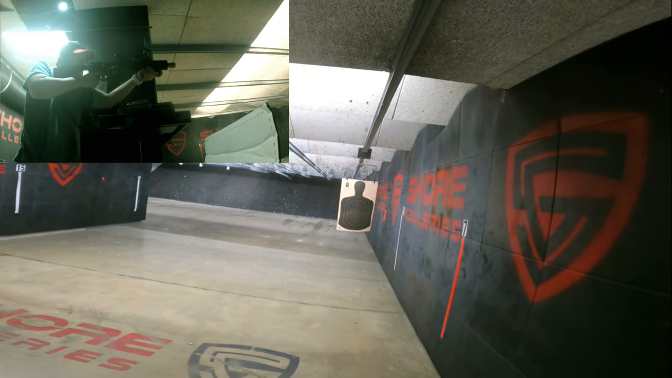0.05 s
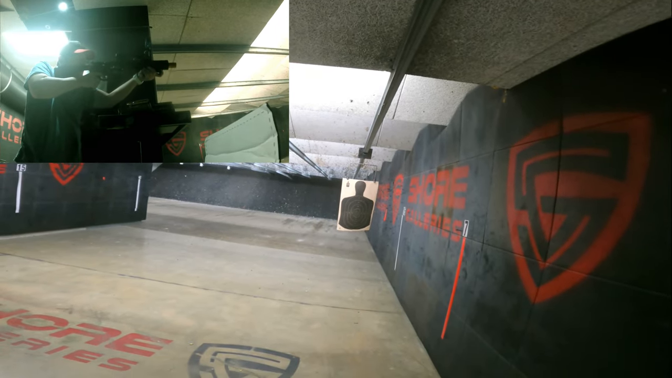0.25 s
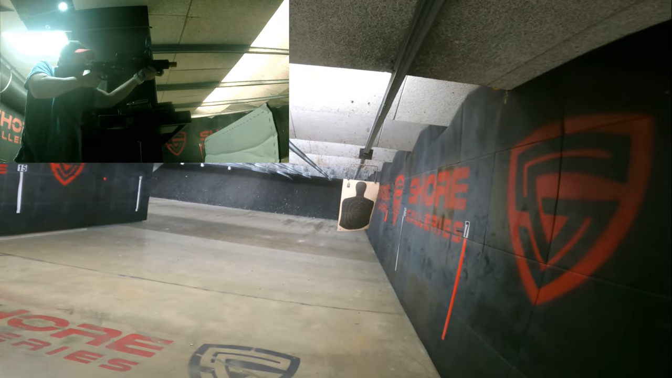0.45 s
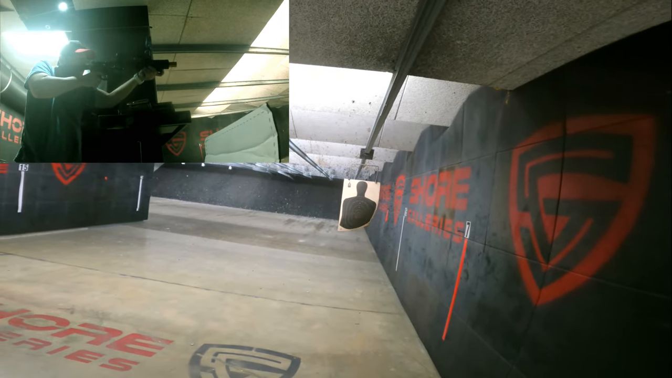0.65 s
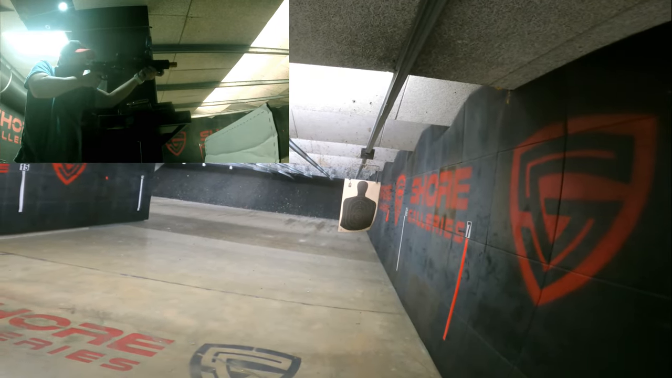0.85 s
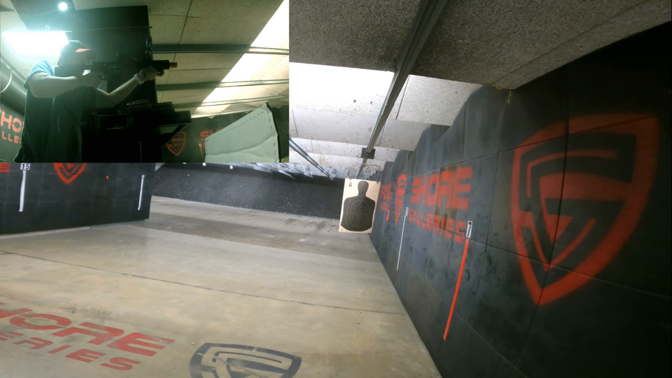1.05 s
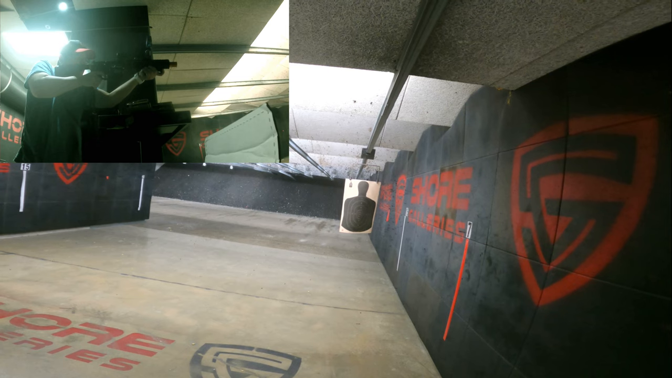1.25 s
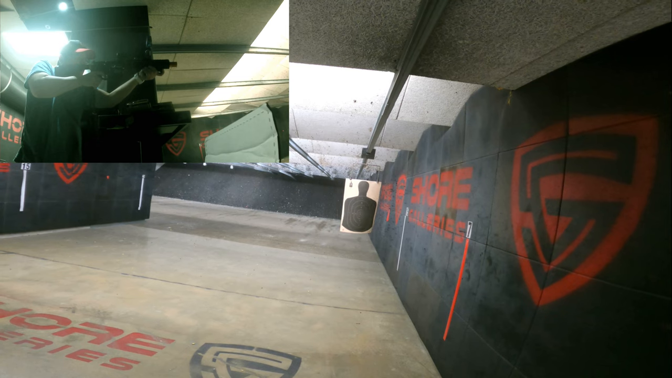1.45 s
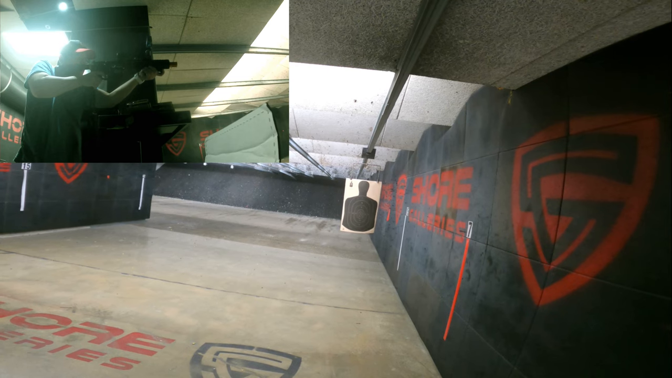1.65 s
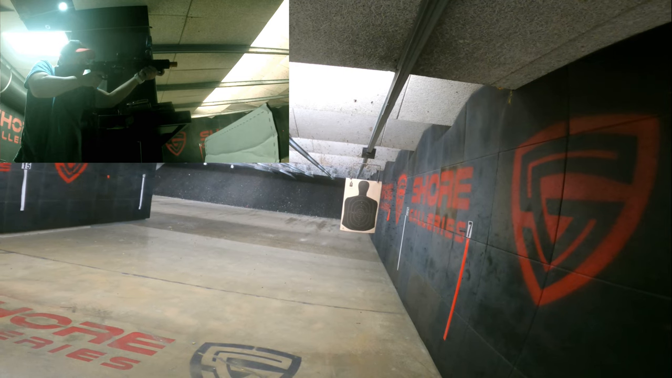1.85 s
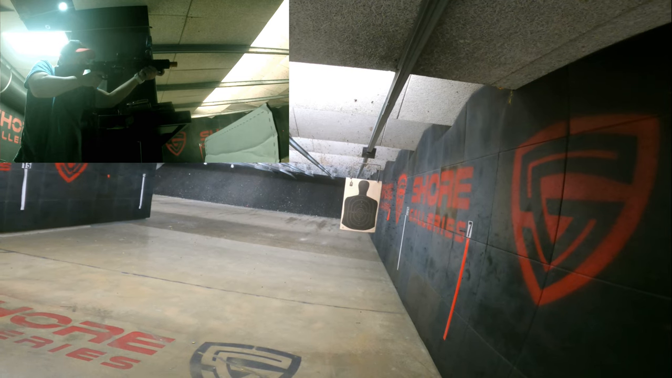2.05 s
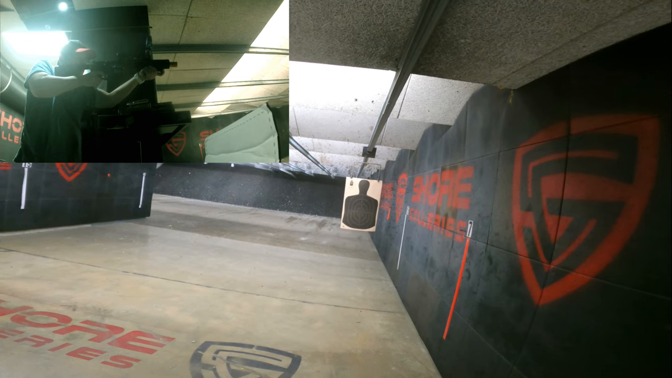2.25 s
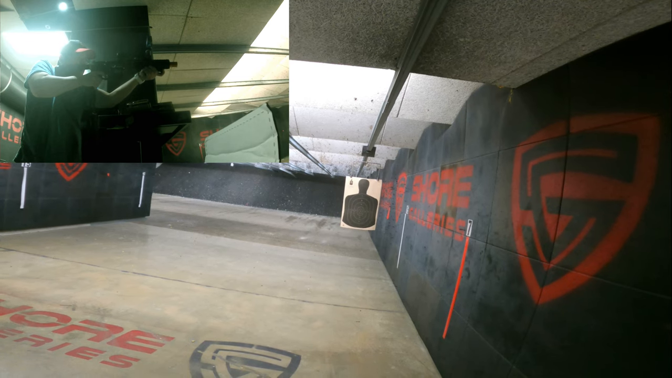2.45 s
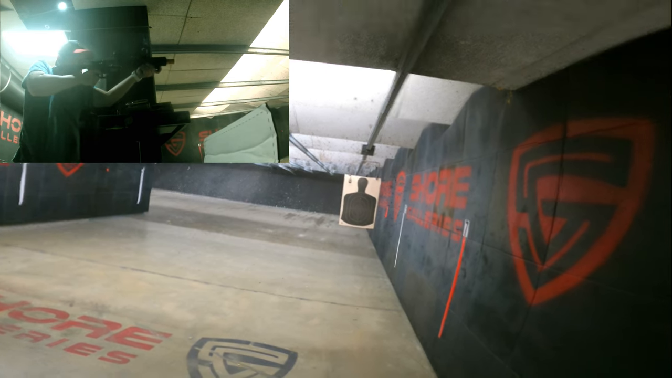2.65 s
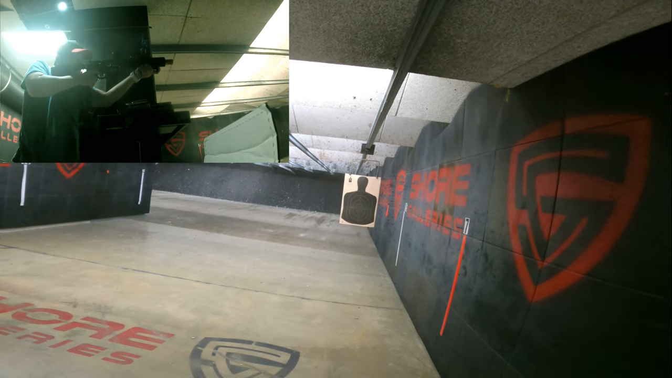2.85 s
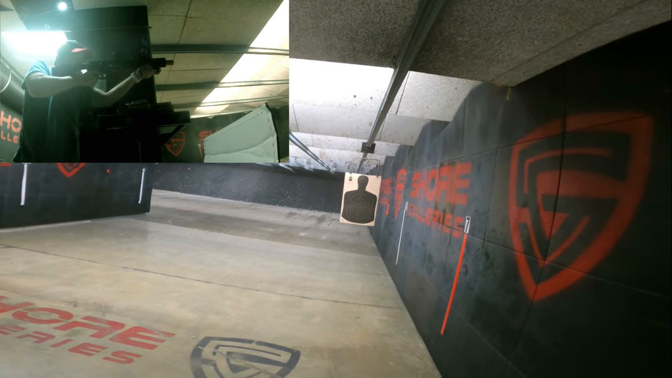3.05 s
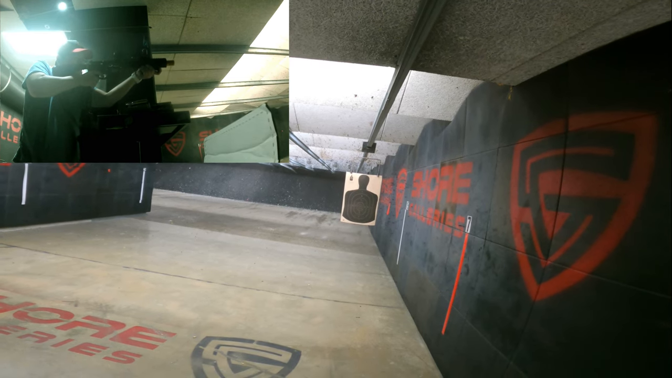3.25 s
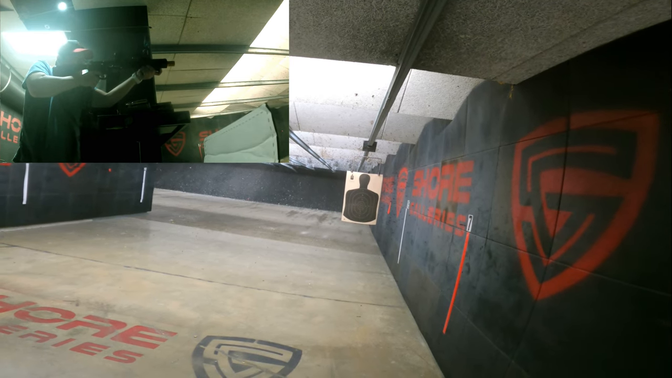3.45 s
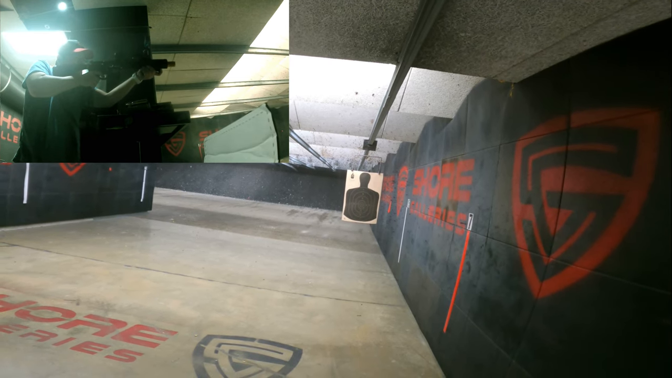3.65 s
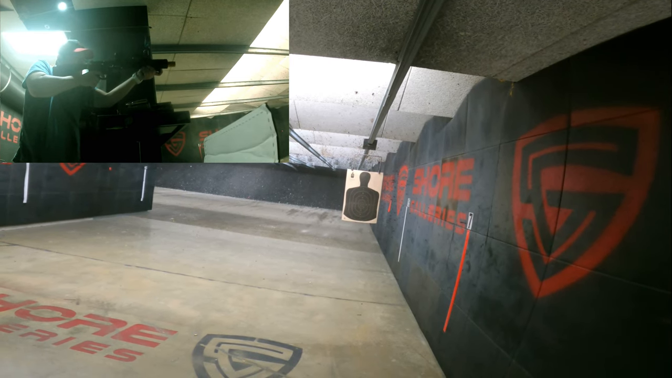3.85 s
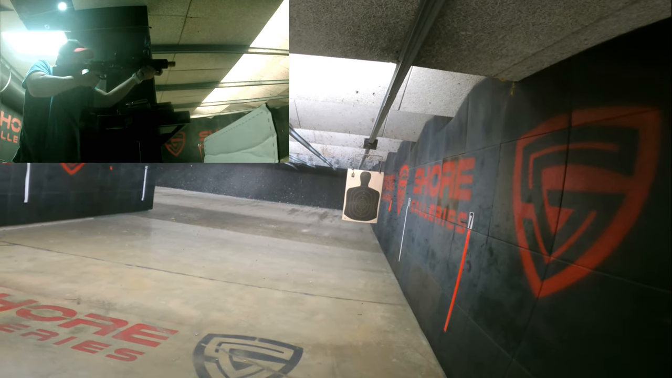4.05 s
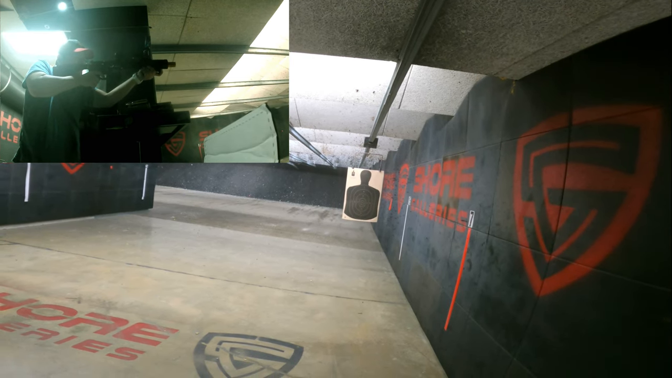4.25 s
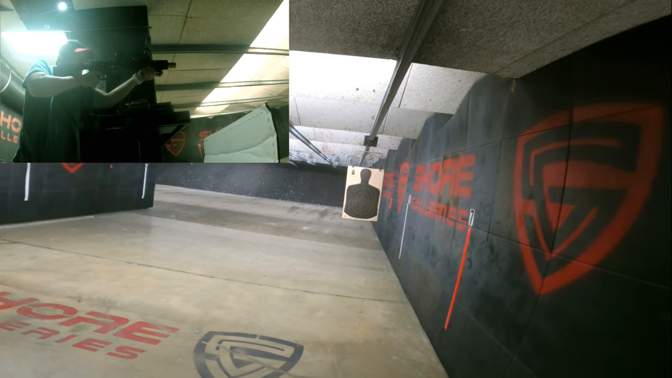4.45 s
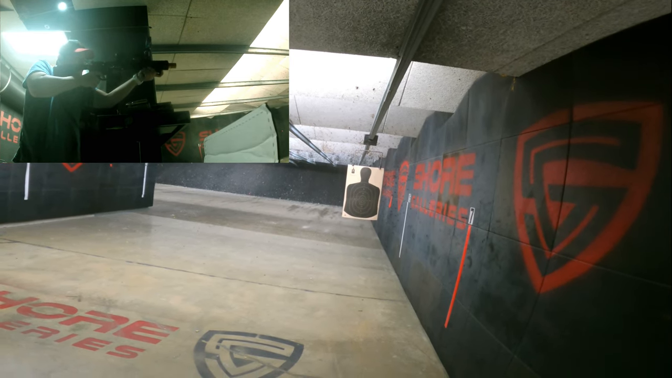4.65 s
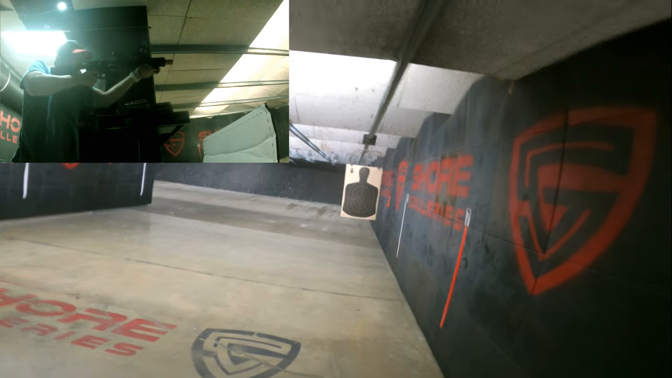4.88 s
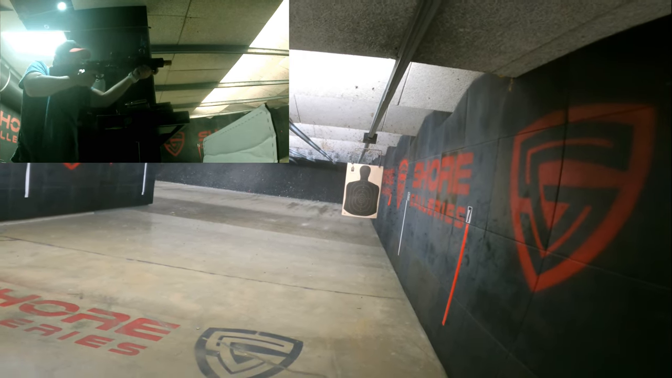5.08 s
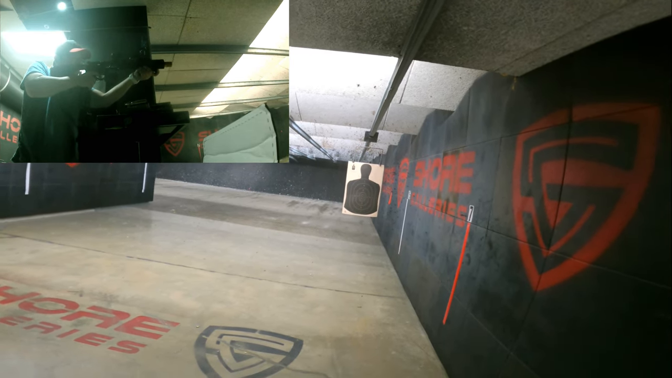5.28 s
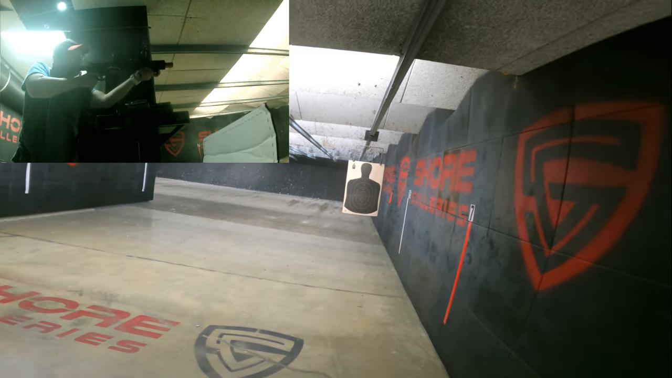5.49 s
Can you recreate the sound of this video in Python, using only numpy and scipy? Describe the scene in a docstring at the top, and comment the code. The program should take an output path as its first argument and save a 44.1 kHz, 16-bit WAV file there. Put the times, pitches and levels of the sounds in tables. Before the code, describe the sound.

In a concrete indoor shooting range, the tail of a rifle shot dies away, then two more shots fire about two seconds apart. Each is a roaring blast that overloads the microphone, with a slow low boom, a steely ring and a short, bright smack just after. In the gaps, faint gear knocks and a very faint tinkle of spent brass sit over rumbling ventilation.

```python
"""A concrete indoor rifle range: one shot is already dying away, and two more follow.
Each blast fills the hall with a roar and a slow boom that drive the microphone far into overload,
and sets steel fittings ringing. A bright smack follows, likely the bullet in the trap.
Gear knocks in the booths, spent brass tinkles on the floor, and the ventilation rumbles on."""
import sys
import numpy as np
from scipy import signal
from scipy.fft import rfft, irfft, next_fast_len
from scipy.io import wavfile
from scipy.ndimage import uniform_filter1d

SR = 44100
rng = np.random.default_rng(int(sys.argv[2]) if len(sys.argv) > 2 else 0)


def unload_audio(sound):
    """Save the sound as a 16-bit wav file, at the path given as the first command line argument."""
    columns = np.transpose(np.atleast_2d(sound))
    # keep every value between -1 and 1, then stretch to whole-number steps
    steps = np.round(np.clip(columns, -1, 1) * 32767)
    wavfile.write(sys.argv[1], SR, steps.astype(np.int16))


N = 243431
TIME = np.arange(N) / SR

# Rifle shot cues: (time [s], blast gain [dB], boom gain [dB], steel ring level [dB])
SHOTS = [(-.455, 0.5, -2, 9), (2.4554, -1.5, 1, 4), (4.6813, -1.5, -5.5, 5)]
# Tone of a blast in the hall: (frequency [Hz], third-octave level before decay [dB])
BLAST_EQ = [(29.4, 9.5), (55.4, 2), (95, 13.5), (203, 11.5), (433, 15.5), (858, 15), (1400, 9), (2160, 6.5),
            (2800, 9.5), (3760, 0), (4570, -1.5), (6740, -0.5), (9700, -2.5), (15000, 9.5)]


def blast_reverb():
    """The blast scatters round the hall in third-octave bands: lows bloom later and last longer."""
    hz, field = diffuse_field()
    lowest_hz, out = 31.25, 0
    thirds = 3 * np.log2(hz / lowest_hz + 1e-9)
    for band in range(28):
        centre = lowest_hz * 2 ** (band / 3)
        attack = 1 - np.exp(-TIME / hall_attack(centre))
        envelope = from_db(at_hz(BLAST_EQ, centre)) * decay(0, hall_t60(centre)) * attack
        level = sum(from_db(db) * np.interp(TIME - s, TIME, envelope) for s, db, _, _ in SHOTS)
        band_noise = to_sound(field * np.maximum(1 - np.abs(thirds - band), 0))
        out = out + level * band_noise
    return out


def hall_attack(hz, quick_s=.002, slow_s=.078, slow_below_hz=216):
    """Build-up time of the reverb: instant in the treble, slow in the lows."""
    return quick_s + slow_s / (1 + (hz / slow_below_hz) ** 5)


def hall_t60(hz, base_s=.9, bass_extra_s=.53, bass_hz=63, panel_hz=2390, air_hz=16000):
    """Decay time of the hall: the bass hangs on, ceiling panels and air shorten the treble."""
    walls = base_s + bass_extra_s / (1 + (hz / bass_hz) ** 4)
    panels = 1 - .18 / (1 + (panel_hz / hz) ** 8)
    return walls * panels / (1 + (hz / air_hz) ** 2)


def roar(level_db, length_s, t60, rise_s, start_hz=979, settled_hz=499.3, sink_s=.04):
    """The first wall of sound: a rough, wavering tone that sinks in pitch and then collapses."""
    out, waver = 0, np.exp(.3 * drift(350))
    for s, blast_db, _, _ in SHOTS:
        age = age_of(s)
        pitch = (settled_hz + (start_hz - settled_hz) * np.exp(-age / sink_s)) * waver
        tone = np.sin(2 * np.pi * np.cumsum(pitch) / SR)
        hold = (1 - np.exp(-age / rise_s)) / (1 + (age / length_s) ** 12)
        out = out + from_db(level_db + blast_db) * hold * decay(s, t60) * tone
    return out


# Standing waves of the hall: (frequency [Hz], level [dB], t60 [s], swell time [s])
ROOM_MODES = [(26.34, 35, 0.99, 0.57), (83.1, 14.5, 1.41, 0.52), (154.2, 6.5, 1.13, 0.084),
              (309.5, 9, 1, 0.17)]


def boom():
    """Standing waves swell slowly after each shot and throb on under the tail."""
    out = 0
    for s, _, boom_db, _ in SHOTS:
        age = age_of(s)
        for hz, db, t60, swell_s in ROOM_MODES:
            swell = 1 - np.exp(-(age / swell_s) ** 3)
            out = out + from_db(boom_db + db) * swell * decay(s, t60) * np.sin(2 * np.pi * hz * age)
    return out


# Ring of the steel fittings: (frequency [Hz], relative level [dB])
STEEL_EQ = [(1550, -25.5), (1800, 6.5), (1930, -1.5), (2080, 0.5), (2250, -23), (4000, -41.5),
            (8000, -77.5)]


def steel_ring(t60):
    """Steel fittings sing on in a narrow band after each blast."""
    return bursts([(s, db, t60) for s, _, _, db in SHOTS], STEEL_EQ)


# Hits on the bullet trap: (time [s], level [dB], t60 [s])
TRAP_HITS = [(2.612, -5.5, .15), (2.6255, 12.5, 0.025), (4.8515, 16.5, 0.019)]
# Bright crack of a hit: (frequency [Hz], relative level [dB])
TRAP_EQ = [(1000, 10.5), (4000, -0.5), (6800, 6.5), (9000, -4), (15000, -5)]


def trap_smack():
    """A short, bright smack, likely the bullet striking the steel trap."""
    return bursts(TRAP_HITS, TRAP_EQ)


# Gear knocking in the booths: (time [s], tap level [dB], thud level [dB])
KNOCKS = [(.318, -38, -50), (0.34, -33, -45), (.558, -37, -34), (.7335, -43, -59), (.8335, -36.5, -60),
          (3.333, -32, -21.5), (3.344, -33, -29), (3.744, -55, -34), (5.441, -31.5, -35)]
# Hard top and dull body of a knock, each: (frequency [Hz], relative level [dB])
TAP_EQ = [(1200, -13), (1750, -1), (2000, 20), (2300, -10.5), (4000, -35), (4600, -49), (9000, -78)]
THUD_EQ = [(100, 12), (450, 17.5), (1000, 11), (3900, -13.5), (4600, -34), (9000, -84)]


def gear_knocks(tap_t60, thud_t60):
    """Gear knocks: each is a hard tap layered over a dull thud."""
    taps = bursts([(s, db, tap_t60) for s, db, _ in KNOCKS], TAP_EQ)
    thuds = bursts([(s, db, thud_t60) for s, _, db in KNOCKS], THUD_EQ)
    return taps + thuds


# Spent cases landing: (time [s], first hop [s], speed kept [ratio], tick level [dB], ring gain [dB])
LANDINGS = [(.5033, .229, 0.82, -61, -67), (1.2995, 0.048, .5, -67, -70), (3.5102, .4086, .44, -51.5, -64)]


def bounces(count=6, hardness=.97):
    """Each bounce loses speed, so hops get shorter and softer: (time [s], tick [dB], ring [dB])."""
    rows = []
    for s, hop_s, kept, tick_db, ring_db in LANDINGS:
        for speed in kept ** np.arange(count):
            loss_db = 20 * hardness * np.log10(speed)
            rows.append((s, tick_db + loss_db, ring_db + loss_db))
            s = s + hop_s * speed
    return rows


# Ringing modes of a brass case: (frequency [Hz], level [dB], t60 [s])
CASE_MODES = [(4380, 3, 0.046), (11170, 2, .5), (12840, -2.5, .5), (14700, 16, .35), (14790, 9, .3)]
# Tick of brass on concrete: (frequency [Hz], relative level [dB])
TICK_EQ = [(2500, 7), (4400, 0), (8000, 0), (11000, -13), (15000, -10)]


def spent_brass(tick_t60, spread_db=1):
    """Each bounce ticks on the concrete and rings the modes of the case, which flutter as it tumbles."""
    contacts = bounces()
    out = bursts([(s, db, tick_t60) for s, db, _ in contacts], TICK_EQ)
    for hz, db, t60 in CASE_MODES:
        # each contact favours other modes
        level = sum(from_db(ring_db + db + spread_db * rng.standard_normal()) * decay(s, t60)
                    for s, _, ring_db in contacts)
        phase = 2 * np.pi * hz * TIME
        tumble = drift(45) * np.sin(phase) + drift(45) * np.cos(phase)
        out = out + level * tumble
    return out


# Rumble of the ventilation: (frequency [Hz], relative level [dB])
VENT_EQ = [(12, -23), (22, -2), (27, 6), (36, -3), (50, -10), (95, -14), (130, -25), (480, -28.5),
           (800, -36), (1200, -36.5), (2000, -51.5), (3000, -59), (5000, -81.5), (12000, -102)]


def ventilation(rumble_db, fan_hz, fan_db):
    """A steady bed of low air noise with a faint, wavering fan tone."""
    rumble = from_db(rumble_db) * coloured_noise(VENT_EQ)
    fan = from_db(fan_db + 3 * drift(11)) * np.sin(2 * np.pi * fan_hz * TIME + drift(8))
    return rumble + fan


# Narrow peaks and dips of the hall: (frequency [Hz], bandwidth [Hz], gain [dB])
HALL_RESONANCES = [(104.5, 2.3, 2.5), (154.7, 14, 6), (269, 23, 5), (312.6, 8.9, 6.5), (450, 22, -2.5),
                   (485.2, 2.5, 3), (546, 3.7, -1), (593, 19, 3), (786, 4.6, 3), (848.3, 30, 7)]
# Stereo width, capped at -2 dB when played: (frequency [Hz], side minus mid [dB])
STEREO_WIDTH = [(100, -77.5), (240, -47), (400, -47), (1000, -26), (2500, -30.5), (4000, -8), (6000, -9.5),
                (14000, 13)]


def diffuse_field():
    """Frequencies and stereo spectrum of noise in the hall: resonant, centred bass, wide treble."""
    size = next_fast_len(N, True)
    hz = np.fft.rfftfreq(size, 1 / SR)
    mid, side = rfft(rng.standard_normal((2, size)))
    lift_db = sum(db / (1 + (2 * (hz - centre) / width) ** 2) for centre, width, db in HALL_RESONANCES)
    side_gain = from_db(np.minimum(at_hz(STEREO_WIDTH, hz), -2))
    return hz, from_db(lift_db) * (mid + side * side_gain * [[1], [-1]])


def coloured_noise(eq):
    """Hall noise shaped by an EQ curve, rolling off below its first point."""
    hz, field = diffuse_field()
    return to_sound(field * from_db(at_hz(eq, hz)) * np.minimum(hz / eq[0][0], 1) ** 2)


def bursts(rows, eq, rise_s=.0015):
    """Noise hits with a slightly rounded attack, from rows of (time [s], level [dB], t60 [s])."""
    envelope = sum(from_db(db) * decay(s, t60) * np.minimum(age_of(s) / rise_s, 1) for s, db, t60 in rows)
    return coloured_noise(eq) * envelope


def to_sound(spectrum):
    """A spectrum as a sound of rms 1."""
    x = irfft(spectrum, next_fast_len(N, True))[:, :N]
    return x / np.sqrt(np.mean(x ** 2) + 1e-20)


def from_db(db):
    """Decibels to gain."""
    return 10 ** (np.asarray(db) / 20)


def at_hz(points, hz):
    """Read a curve of (frequency [Hz], value) on a log-frequency axis."""
    points = np.array(points)
    return np.interp(np.log(hz + 1e-9), np.log(points[:, 0]), points[:, 1])


def age_of(s):
    """Seconds since a cue, zero before it."""
    return np.maximum(TIME - s, 0)


def decay(s, t60):
    """Exponential tail that starts at a cue and runs down by 120 dB."""
    out, live = np.zeros(N), slice(*np.searchsorted(TIME, [s, s + 2 * t60]))
    out[live] = np.exp(-np.log(1000) * (TIME[live] - s) / t60)
    return out


def drift(rate_hz):
    """Smooth random wander of spread about 1."""
    return np.interp(TIME * rate_hz, np.arange(N), rng.standard_normal(N))


def low_pass(x, hz, order):
    """Low-pass without delay."""
    return signal.sosfiltfilt(signal.butter(order, hz, fs=SR, output="sos"), x)


def scene():
    """Shots, their aftermath and the ventilation, as pressure at the microphone."""
    shots = blast_reverb() + boom() + steel_ring(t60=.99)
    shots += roar(level_db=25.5, length_s=.162, t60=2.67, rise_s=.0092)
    foley = trap_smack() + gear_knocks(tap_t60=.057, thud_t60=.12) + spent_brass(tick_t60=.17)
    return shots + foley + ventilation(rumble_db=-21.5, fan_hz=502, fan_db=-45.5)


def overload(dry, rail=.89, sag=.19, edge_hz=3950, shut_db=18, rasp_db=-19, lean_db=1, side_db=-31.5):
    """Lows and mids saturate to a gritty square wave; width and treble duck, and the treble shuts off."""
    mid = dry.mean(axis=0)
    loudness = np.sqrt(np.abs(uniform_filter1d(mid ** 2, size=900)) + 1e-12)
    duck = rail / np.hypot(rail, loudness)
    depth = 1 - duck   # 0 when clean, near 1 when pinned to the rails
    squared = rail * (1 - sag * depth) * np.tanh(mid / rail)   # the rails sag under load
    grit = .225 * np.exp(.5 * drift(300)) * rng.standard_normal(N)   # comes in spits
    # a faint stereo noise widens the loudest part of each blast
    side_noise = from_db(side_db) * low_pass(rng.standard_normal(N), 1500, order=1) * [[1], [-1]]
    body = low_pass(squared + depth * (grit + side_noise), edge_hz, order=12)
    clean_body = low_pass(dry, edge_hz, order=12)
    width = duck * (clean_body - clean_body.mean(axis=0))
    # the square edges leak into the treble
    rasp = from_db(rasp_db) * depth * (squared - low_pass(squared, edge_hz, order=12))
    squeeze = 1 - .5 * (squared / rail) ** 2   # little rides on a wave that sits at the rail
    treble = (duck * squeeze * (dry - clean_body) + rasp) * from_db([[lean_db], [-lean_db]])
    treble_gate = .5 - .5 * np.tanh((20 * np.log10(loudness) - shut_db) / 2)   # closes at the loudest
    return body + width + treble_gate * treble


def record(dry, soften_hz=8350, cutoff_hz=15900):
    """The microphone overloads; stray peaks hit full scale and crackle; the top is softened and cut."""
    crackling = np.clip(overload(dry), -1, 1)
    softened = low_pass(crackling, soften_hz, order=1)
    return low_pass(softened, cutoff_hz, order=20)


dry = scene()
out = record(dry)
unload_audio(out)
```